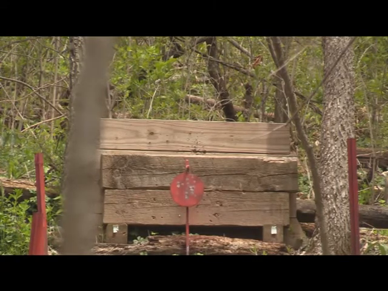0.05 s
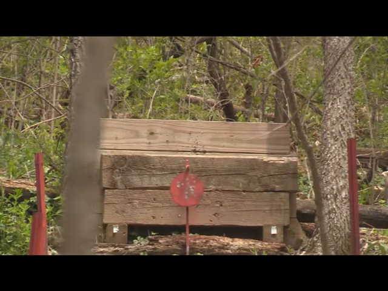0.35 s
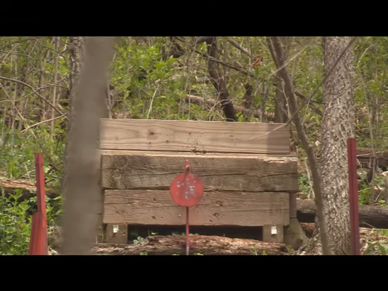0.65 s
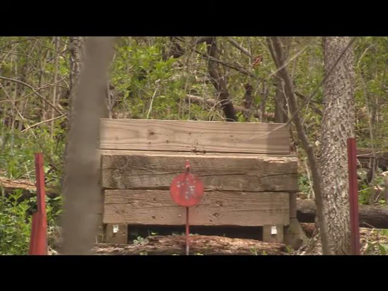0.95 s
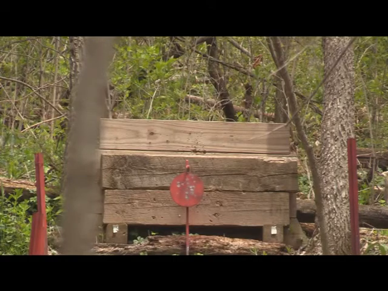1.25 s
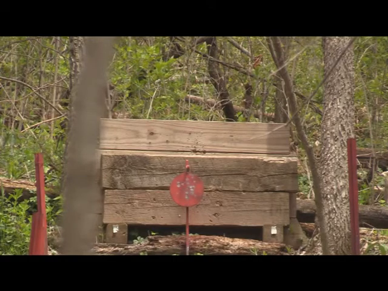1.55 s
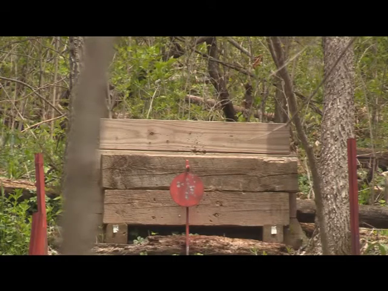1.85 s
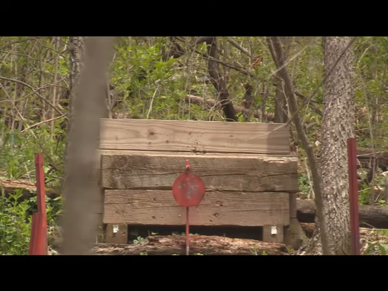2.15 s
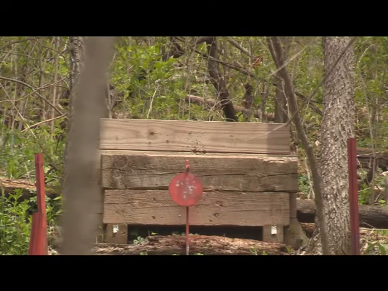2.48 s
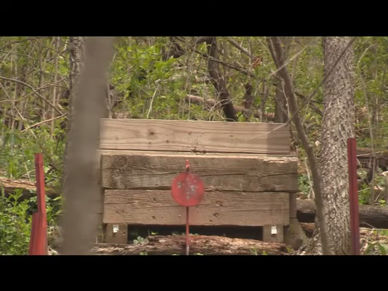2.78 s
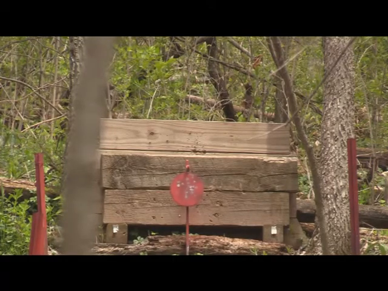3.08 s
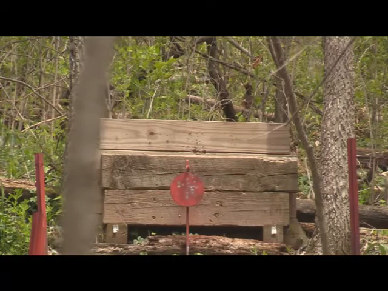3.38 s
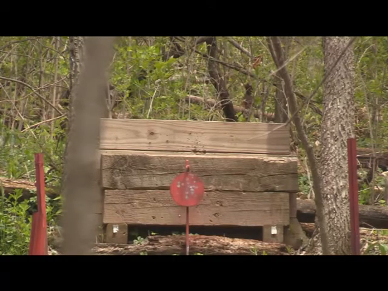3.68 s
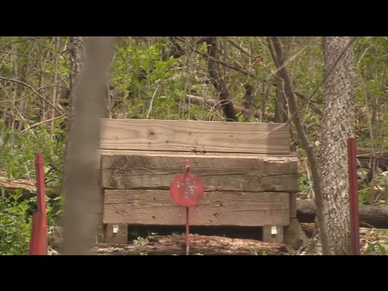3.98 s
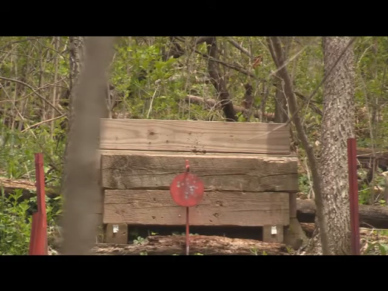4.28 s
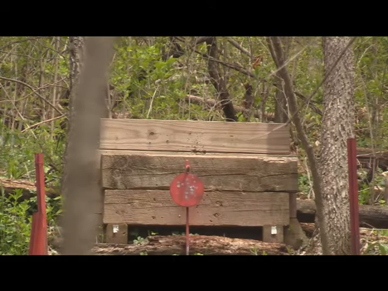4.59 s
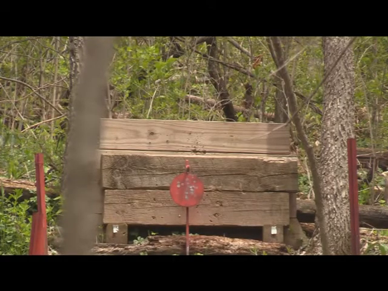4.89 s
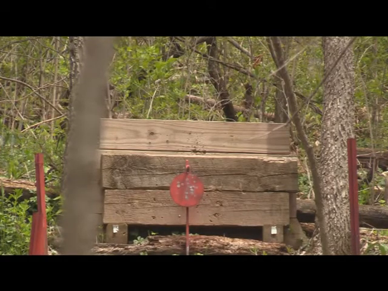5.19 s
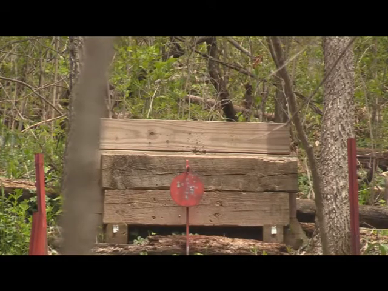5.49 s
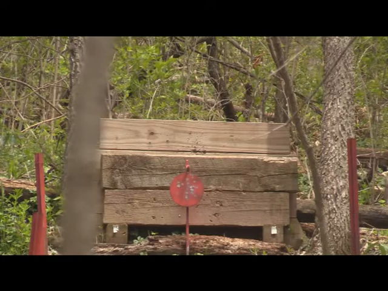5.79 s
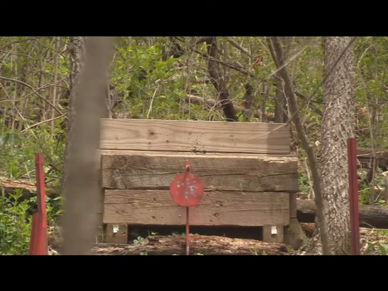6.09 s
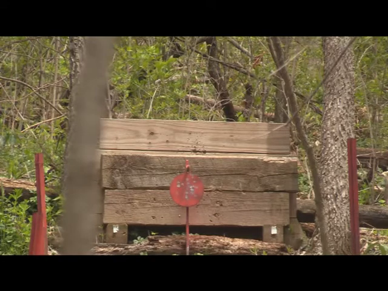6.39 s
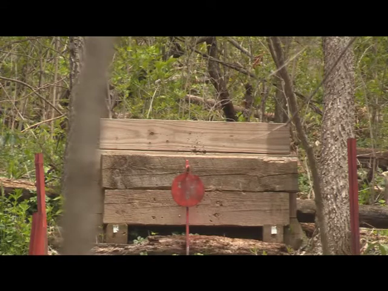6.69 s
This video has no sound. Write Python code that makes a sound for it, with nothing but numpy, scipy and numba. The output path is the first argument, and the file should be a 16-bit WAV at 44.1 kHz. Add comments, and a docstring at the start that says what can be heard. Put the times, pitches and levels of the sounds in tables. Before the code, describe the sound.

Heard from next to the shooter on a wooded range, a small rifle cracks twice, several seconds apart. Each shot scatters through the trees and is answered almost at once by a bright ping from a steel plate. After the first, the bolt clacks open, slides and locks shut. Small birds chip and whistle faintly over a soft hush and low outdoor rumble.

```python
"""Two rimfire rifle shots on a woodland range, heard from beside the shooter.
Each crack is a cluster of pressure fronts that scatters back from the trees. A fifth of a second later
the bullet strikes a small steel plate, whose ring swells and fades as it swings.
Between the shots the bolt is worked, its clicks and slides ringing the stock and the steel action.
Small birds chip and whistle over a quiet hush and a low outdoor rumble."""
import sys
import numpy as np
from scipy import signal
from scipy.fft import rfft, irfft
from scipy.io import wavfile
from numba import njit

SR = 44100
rng = np.random.default_rng(int(sys.argv[2]) if len(sys.argv) > 2 else 0)


def store_wav(level_fs):
    """Save 16-bit WAV to argv[1]."""
    pcm = np.round(np.clip(np.atleast_2d(level_fs), -1, 1) * 32767)
    wavfile.write(sys.argv[1], SR, pcm.T.astype(np.int16))


N = 302085
T = np.arange(N) / SR

# Each row: start in seconds, level in dB, seconds until the strike is heard, share of the plate's ring
# left between its lobes (0-1), bell level in dB, overtone level in dB.
SHOTS = [(1.8683, -1, .2018, .08, 9.5, -6), (6.5036, -2, .2083, 0.55, 4, -4.5)]
# Tone of an echo off the trees. Each row: frequency in Hz, level in dB.
TREE_TONE = [(60, -20), (170, -9), (400, -18.5), (720, -3), (1200, -3), (2300, 0.5), (5000, 4), (6500, 1.5),
             (9000, -7), (12500, -12), (16000, -32.5)]


def undb(db):
    """Decibels to gain."""
    return 10 ** (np.asarray(db) / 20)


def unit(x):
    """Scale to an rms of one."""
    return x / np.sqrt(np.mean(x ** 2))


def add(out, start, x):
    """Mix x into out from start, in seconds."""
    i = max(int(start * SR), 0)
    out[i:i + len(x)] += x[:max(len(out) - i, 0)]


def colour(x, points, size=4096):
    """Causal EQ of unit power, shaped by (Hz, dB) points."""
    hz, db = np.transpose(points)
    bin_hz = np.arange(size // 2 + 1) * SR / size
    log_gain = np.log(undb(np.interp(np.log(bin_hz + 1), np.log(hz), db)))
    cepstrum = irfft(log_gain)[:size // 2]
    cepstrum[1:] *= 2
    response = irfft(np.exp(rfft(cepstrum, size)))
    return signal.fftconvolve(x, response / np.linalg.norm(response))[:len(x)]


def fade(t, t60):
    """Exponential decay, 60 dB in t60 seconds."""
    return np.exp(-np.log(1000) * t / t60)


def burst(t, t60, tone):
    """Decaying noise through an EQ curve."""
    return colour(rng.standard_normal(len(t)) * fade(t, t60), tone)


def ring(modes, t):
    """Freely decaying modes (Hz, dB, t60)."""
    return sum(undb(db) * fade(t, t60) * np.sin(2 * np.pi * (hz * t + rng.random()))
               for hz, db, t60 in modes)


def resonate(x, modes, size=1024):
    """Drive damped resonances (Hz, width in Hz, dB) at unit power gain."""
    t = T[:size]
    response = sum((-1) ** k * undb(db) * width * np.exp(-np.pi * width * t) * np.sin(2 * np.pi * hz * t)
                   for k, (hz, width, db) in enumerate(modes))
    response = np.diff(response)  # small parts radiate little bass
    return signal.fftconvolve(x, response / np.linalg.norm(response))[:len(x)]


def wander(rate_hz, size=N):
    """Smooth random drift with a spread near one."""
    step = int(SR / rate_hz)
    knots = size // step + 2
    return np.interp(np.arange(size) / step, np.arange(knots), rng.standard_normal(knots))


@njit
def follow(x, attack, release):
    """Envelope follower with separate rates for rising and falling."""
    out, level = np.empty(len(x)), 0.
    for i in range(len(x)):
        level += (x[i] - level) * (attack if x[i] > level else release)
        out[i] = level
    return out


def outdoors(hush_db=-52, wind_db=-55.5, ease_db_per_s=0.93, waver_db=2):
    """A steady distant hush over a low rumble that eases as the wind drops and briefly swells."""
    # Tone of the hush. Each row: frequency in Hz, level in dB.
    hush_tone = [(12, -26), (20, 3), (60, -14), (130, -6), (270, -10.5), (337, -12.5), (388, -13),
                 (558, -16.5), (3070, -27), (6010, -27.5), (7310, -30), (14700, -34.5), (16000, -33)]
    # Low rumble swells: two wind gusts and, between them, the rifle's rest shaking as the bolt is worked.
    # Each row: peak time in seconds, half length in seconds, level in dB.
    rumble_swells = [(0.403, 0.25, -56.5), (2.597, .15, -58.5), (6.302, 0.16, -52.5)]
    rumble_tone = [(15, 3), (35, -5.5), (80, -7), (250, -41), (1000, -73.5)]
    hush = colour(rng.standard_normal(N), hush_tone) * undb(hush_db + 0.35 * wander(4.2))
    rumble = colour(rng.standard_normal(N), rumble_tone)
    breeze = undb(wind_db - ease_db_per_s * T)
    swells = sum(undb(db) * np.exp(-((T - peak) / half) ** 2) for peak, half, db in rumble_swells)
    return hush + rumble * (breeze + swells) * undb(waver_db * wander(2.5))


def birds(waver=0.012, rasp=0.11, leaves_t60=0.5, chip_rise=0.23, chip_bend=2.6, flick_s=.009):
    """Nearly pure whistles, one pitch gesture for each kind of call; foliage smears the far ones."""
    # A small bird's chips, quick rises that level off. Each row: start in seconds, length in seconds,
    # top pitch in Hz, level in dB, share heard through foliage (0-1).
    chips = [(1.31, 0.018, 6500, -42.5, 0.57), (1.586, 0.017, 6560, -42.5, 0.5),
             (4.936, 0.015, 6400, -49.5, 0.65), (5.869, 0.031, 6670, -45, 0.42),
             (6.204, 0.022, 6600, -39.5, 0.4), (6.257, 0.051, 6880, -38, 0.42),
             (6.337, 0.034, 6600, -37.5, 0.3), (6.446, .04, 6900, -38.5, 0.45)]
    # Soft falling calls deep in the foliage. Each row: start in seconds, level in dB.
    far_calls = [(1.372, -47), (1.466, -48), (1.682, -51.5), (5.976, -49)]
    # Another bird's upslurs. Each row: start in seconds, length in seconds, level in dB.
    whistles = [(3, 0.12, -54), (3.525, 0.15, -44.5), (3.88, 0.13, -45.5), (4.241, 0.12, -58)]
    # Thin high notes. Each row: start and length in seconds, first and last pitch in Hz, level in dB.
    thin_notes = [(0, 0.043, 7850, 7750, -56), (0.111, 0.3, 7600, 8260, -60.5),
                  (2.63, 0.064, 7740, 6600, -41.5)]
    direct, scattered = np.zeros(N), np.zeros(N)

    def glide(length, first=0, last=1):
        return np.linspace(first, last, int(length * SR))

    def sing(start, hz, db, far):
        size = len(hz)
        hz = hz * (1 + (waver + rasp * far ** 4) * wander(500, size))
        arch = np.abs(np.sin(np.linspace(0, np.pi, size))) ** 0.41
        note = undb(db + 2 * wander(90, size)) * arch * np.sin(2 * np.pi * np.cumsum(hz) / SR)
        add(direct, start, np.sqrt(1 - far) * note)
        add(scattered, start, np.sqrt(far) * note)

    for start, length, top, db, far in chips:
        hz = top * (1 - chip_rise * np.exp(-chip_bend * glide(length)))
        sing(start, hz, db, far)
        sing(start, hz * 1.23, db - 10.5, far)  # the other side of the bird's throat
        if length > .03:  # longer chips end in a downward flick
            sing(start + length - flick_s, glide(flick_s, top, 4300), db - 4, far)
    for start, db in far_calls:
        sing(start, glide(.04, 5700, 4300), db, far=1)
    for start, length, db in whistles:
        slur = np.sin(np.pi / 2 * glide(length) ** .97) ** 2
        sing(start, np.interp(slur, [0, 1], [2280, 3400]), db, far=0.24)
    for start, length, first, last, db in thin_notes:
        sing(start, glide(length, first, last), db, far=0.25)
    leaves = rng.standard_normal(SR) * fade(T[:SR], leaves_t60) * (1 - fade(T[:SR], 0.094))
    return direct + signal.fftconvolve(scattered, leaves / np.linalg.norm(leaves))[:N]


def woods(patchy_db=1.56, grain_db=0.5, dulling_s=0.14, dull_hz=4500, rise_s=.014, release_t60=.2):
    """Echo of countless trunks and twigs, stand behind stand; longer paths lose their treble."""
    # Stands of trees. Each row: first and last echo in seconds, level in dB, t60 in seconds.
    stands = [(.003, .075, -6, .27), (0.063, .19, -6.5, .72), (.21, .44, -24, 1.7),
              (.44, 1.199, -51.5, 2.8)]
    t = T[T < stands[-1][1]]
    twigs = unit(rng.standard_normal(len(t)) * undb(grain_db * rng.standard_normal(len(t))))
    bright = colour(twigs, TREE_TONE)
    dull = signal.sosfiltfilt(signal.butter(2, dull_hz, fs=SR, output="sos"), bright)
    echo = dull + (bright - dull) * np.exp(-t / dulling_s)
    power = 0
    for first, last, db, t60 in stands:
        age = np.maximum(t - first, 0)
        swell = 1 - np.exp(-(age / rise_s) ** 2)
        release = fade(np.maximum(t - last, 0), release_t60)
        power = power + (undb(db) * swell * fade(age, t60) * release) ** 2
    return echo * np.sqrt(power) * undb(patchy_db * wander(216.2, len(t)))


def rifle_action(rattle_db=-27, rattle_t60=0.22, grit_db=5, pin_lead_s=.0098, lock_s=2.928, size=8000):
    """Each contact rings the wooden stock, the steel action and its edges; loose parts rattle on."""
    # The rifle is settled; the bolt lifts, hits its rear stop, feeds a round, closes; the hand returns.
    # Each row: start in seconds, level in dB, relative thud in dB, relative brightness in dB.
    contacts = [(.218, -49, -10, -2), (.585, -48.5, -11, 0), (1.137, -38, -22, 0.5), (2.3581, -23, 2, -13),
                (2.3684, -8.5, -3.5, -9.5), (2.377, -21, -4, -13), (2.382, -10.5, -8, -11),
                (2.4248, -4, -12, -9.5), (2.485, -22.5, -9, -17), (2.516, -19, 3, -1),
                (2.5221, -1.5, -11.5, -8.5), (2.5282, -12, -3.5, 1.5), (2.5415, -3.5, -10, -11),
                (2.549, -15, -5.5, -8), (2.5855, -23.5, 10, -12), (2.7544, -9.5, -4.5, -10.5),
                (2.7996, -15, -13.5, -19), (2.816, -21.5, -15, -19), (2.83, -25, 1.5, -6.5),
                (2.854, -6.5, -8, -13), (2.857, -5.5, -10, -13), (2.88, -29, 4, -8.5),
                (2.904, -18, -2, -20), (2.92, -9.5, -2, -6), (2.9275, 1, -14.5, 1.5),
                (3.0895, -34.5, 0, -26), (3.122, -20, -44, -18), (3.2442, -32, -2, -9.5),
                (3.3113, -28.5, -25, -13), (4.459, -40, -15.5, -5), (4.488, -41.5, -8.5, -9)]
    # The bolt slides and hands brush the rifle. Each row: start and length in seconds, level in dB.
    slides = [(0.39, 0.065, -56.5), (1.079, 0.045, -54), (2.345, 0.0513, -30), (2.734, 0.016, -38.5),
              (2.793, 0.11, -31.5), (2.913, 0.032, -17), (3.23, 0.13, -46.5), (3.975, 0.069, -54.5)]
    # Resonances of the three parts. Each row: frequency in Hz, width in Hz, level in dB.
    stock = [(336, 200, -1.5), (676, 130, 5), (948, 120, 1.5), (1640, 313, 1), (1942, 285, -4)]
    action = [(2440, 740, -1.5), (3650, 580, -2.5), (4384, 350, -2), (4760, 360, -1.5), (5830, 530, -2),
              (5900, 340, -11)]
    edges = [(6628, 400, 10.5), (8240, 270, -15.5), (8590, 300, 0), (10550, 2700, 1.5), (13740, 1500, -6.5)]
    # A contact shakes the rifle's rest; the action rings on as the bolt locks.
    # Each row: frequency in Hz, level in dB, t60 in seconds.
    rest_modes = [(38, -38, .25), (150, -36, .1)]
    lock_modes = [(3063, -22, .27), (3268, -42, .25), (6024, -36, .12), (11470, -48, .22)]
    out, t = np.zeros(N), T[:size]

    def body(force, thud, bright):
        parts = (stock, thud - .5), (action, 0), (edges, bright - 1)
        return sum(undb(db) * resonate(force, modes) for modes, db in parts)

    def chatter(t60):
        return rng.choice([-1, 1], size) * fade(t, t60)

    for start, db, thud, bright in contacts:
        contact_t60 = .015 * undb(.3 * (thud - bright))  # dull contacts last longer than bright ones
        blow = body(chatter(contact_t60), thud, bright)
        rattle = undb(rattle_db) * body(chatter(rattle_t60), thud=-7, bright=-4)
        bump = ring(rest_modes, t) * (1 - fade(t, 0.023))
        add(out, start, undb(db) * (blow + rattle + bump))
    for start, length, db in slides:  # steel catches on steel in tiny uneven slips
        grit = unit(rng.standard_normal(size) * undb(grit_db * wander(500, size)))
        stroke = np.sin(np.pi * np.minimum(t / length, 1))
        add(out, start, undb(db) * body(grit * stroke, thud=-7.5, bright=-18))
    for start, *_ in SHOTS:  # the firing pin falls just ahead of the shot
        add(out, start - pin_lead_s, undb(-29) * body(chatter(t60=.013), thud=-1.3, bright=-10))
    for start in rng.random(7) * T[-1]:  # faint stray ticks of handling
        add(out, start, undb(-54) * body(chatter(t60=.015), thud=-16, bright=-2))
    add(out, lock_s, ring(lock_modes, T[:SR]))
    return out


def steel_plate(kick, lobe_floor, bell_db, overtones_db, bell_t60=2.1, overtone_t60=0.9, build_s=.009,
                swing_hz=1.66, swing_s=.085, settle_s=0.32, shudder_hz=17, shudder_s=.14):
    """The bullet splashes on steel; returns the brief clang and long modes that throb with the swing."""
    # The long modes. Each row: frequency in Hz, level in dB.
    bell_modes = [(5881, 0), (6119, -33), (6180, -38)]
    overtone_modes = [(9910, -2), (9654, -11)]
    # The shorter modes. Each row: frequency in Hz, level in dB, t60 in seconds.
    clang_modes = [(1597, -37, .7), (2326, -37.5, .6), (2497, -15, 0.12), (2525, -32.5, 0.89),
                   (3338, -33.5, 0.39), (3628, -26, .65), (4942, -25, 0.22), (6178, -25, .33),
                   (7635, -31, 0.75), (9080, -28.5, .33), (10425, -25, .42), (11315, -28, .3),
                   (11745, -35, 0.49), (12100, -36.5, .45), (13395, -44, 0.52), (14280, -37, 0.492),
                   (14862, -34, .5)]
    # Tone of the bullet's splash. Each row: frequency in Hz, level in dB.
    splash_tone = [(100, -18), (400, -12.5), (700, -5), (1200, -1.5), (2500, -2), (5000, 1), (7000, -0.5),
                   (10000, -16), (16000, -7)]
    t = T[:SR]
    # The plate swings on its hook and shudders, turning its lobes to and from the listener.
    angle = kick * np.sin(2 * np.pi * swing_hz * t) * np.exp(-t / swing_s)
    facing = np.hypot(np.sin(angle), lobe_floor * np.exp(-t / settle_s))
    shudder = 1 - .8 * np.cos(2 * np.pi * shudder_hz * t) * np.exp(-t / shudder_s)
    build = 1 - np.exp(-t / build_s)
    bell = undb(bell_db) * facing * build * ring([(hz, db, bell_t60) for hz, db in bell_modes], t)
    overtones = undb(overtones_db) * ring([(hz, db, overtone_t60) for hz, db in overtone_modes], t)
    throb = (bell + shudder * overtones) * (1 - t ** 2)
    # Every shorter mode has lobes of its own, so each wavers by itself.
    clang = sum(ring([mode], t) * undb(4 + 4 * wander(28, len(t))) for mode in clang_modes)
    splash = undb(1) * burst(t, 0.012, splash_tone)
    return clang + splash, throb


def rifle_shot(echo, push_s=0.0028, roll_db=-29.5, roll_t60=.28, size=12000):
    """Sharp fronts, each with a push of air and its suction, then the trees' answer."""
    # Pressure fronts. Each row: delay in seconds, crack level in dB, crack length in seconds, push gain.
    fronts = [(0, 4.5, 0.00056, 0.019), (.0013, -4, 0.0056, 0.27), (.0052, -4.5, 0.0018, 1.3),
              (0.0088, -3.5, .005, .05)]
    # Tones of the crack and of the blast rolling over the ground. Each row: frequency in Hz, level in dB.
    crack_tone = [(150, 11), (500, -11.5), (1500, 0), (3000, 0.5), (5800, 7), (8000, 0), (12000, -2.5),
                  (16000, -24)]
    roll_tone = [(30, -8), (90, -3), (165, 0), (260, -4), (400, -26), (1500, -60)]
    # A short hollow boom: the ground bounces the blast back and the shooting bench thumps. Each row: frequency
    # in Hz, level in dB against the push, t60 in seconds.
    boom_modes = [(85, -15, .06), (250, -21, 0.06)]
    # Echoes off single near trunks. Each row: delay in seconds, level in dB.
    trunks = [(.047, -6), (0.0575, -6), (.166, -14)]
    t, out = T[:size], echo.copy()
    for delay, db, length, push in fronts:
        crack = colour(rng.standard_normal(size) * np.exp(-(t / length) ** 2), crack_tone)
        blast = (1 - t / push_s) * np.exp(-t / push_s)
        boom = sum(undb(level) * fade(t, t60) * np.cos(2 * np.pi * hz * t)
                   for hz, level, t60 in boom_modes)
        add(out, delay, undb(db) * crack + push * (blast + boom))
    add(out, fronts[1][0], undb(roll_db) * burst(t, roll_t60, roll_tone))
    for delay, db in trunks:
        add(out, delay, undb(db) * burst(t, 0.0029, TREE_TONE))
    return out


def scene(swing_kicks=(11.7, 13.3), throb_echo_db=-30, clang_echo_db=-7, action_echo_db=-34):
    """Shots, plate and bolt sound into the same woods, over the birds, the hush and the rumble."""
    out, echo = np.zeros(N), woods()
    shot, trees = rifle_shot(echo), echo / np.linalg.norm(echo)
    for (start, db, flight, *strike), kick in zip(SHOTS, swing_kicks):
        add(out, start, undb(db) * shot)
        clang, throb = steel_plate(kick, *strike)
        add(out, start + flight, clang + throb)
        echo_send = undb(throb_echo_db) * throb + undb(clang_echo_db) * clang
        add(out, start + flight, signal.fftconvolve(echo_send, trees))
    action = rifle_action()
    out += action + undb(action_echo_db) * signal.fftconvolve(action, trees)[:N]
    return (out + birds() + outdoors())[None]


def record(dry, threshold_db=-15, ratio=2, attack_s=0.0038, release_s=0.0086, top_hz=15800):
    """A fast compressor turns loud passages down, the peaks clip and a low-pass cuts the top."""
    envelope = follow(np.abs(dry[0]), 1 / (attack_s * SR), 1 / (release_s * SR))
    compressed = dry * np.maximum(envelope / undb(threshold_db), 1) ** (1 / ratio - 1)
    lowpass = signal.ellip(8, .2, 70, top_hz, fs=SR, output="sos")
    return signal.sosfilt(lowpass, np.clip(compressed, -1, 1))


dry = scene()
out = record(dry)
store_wav(out)
```